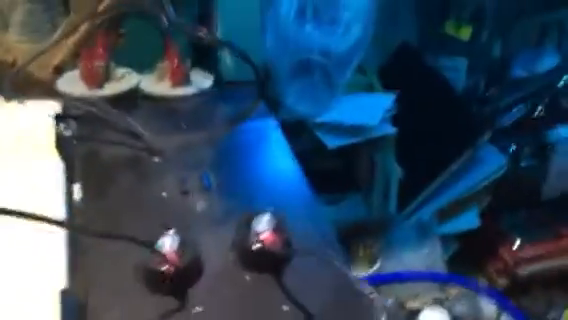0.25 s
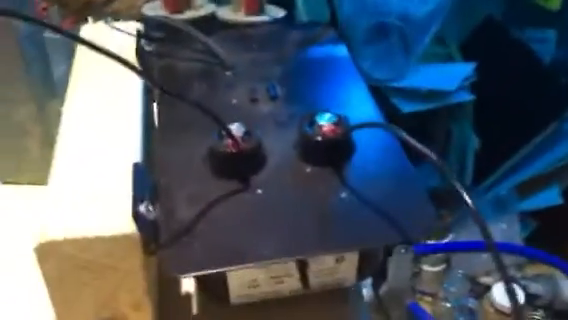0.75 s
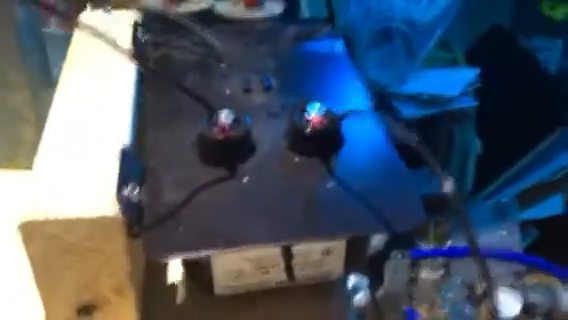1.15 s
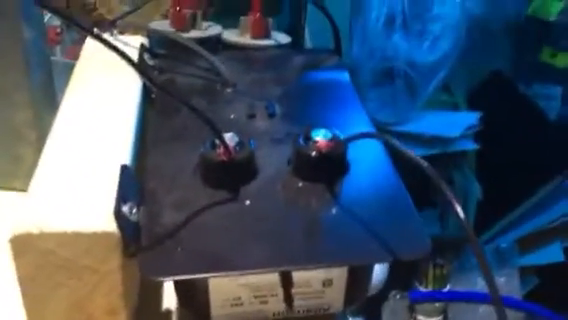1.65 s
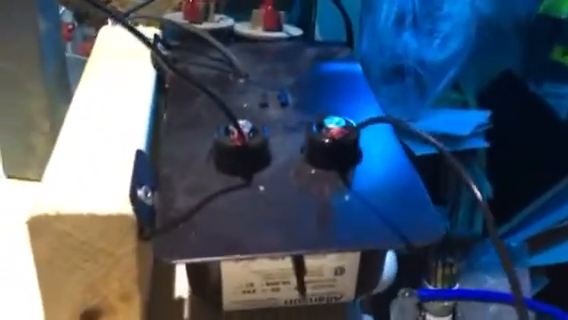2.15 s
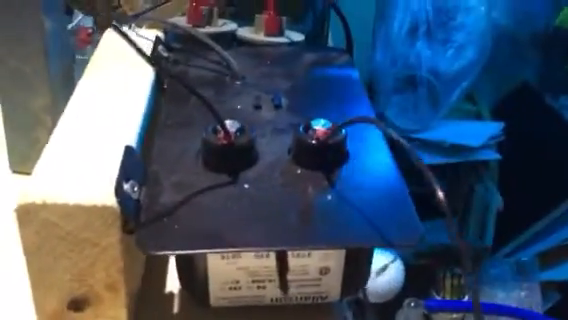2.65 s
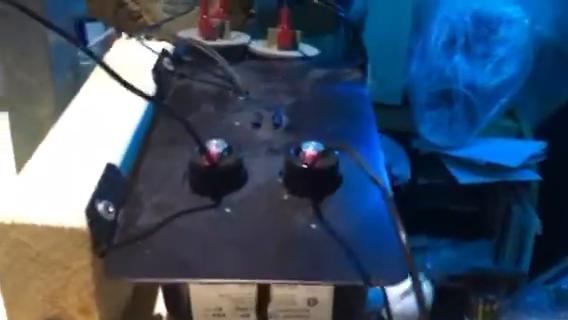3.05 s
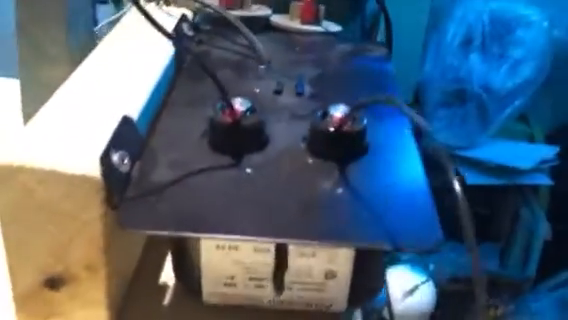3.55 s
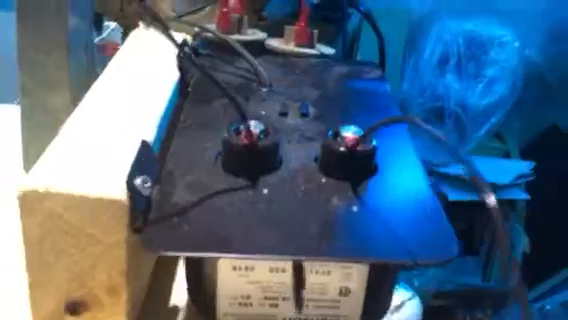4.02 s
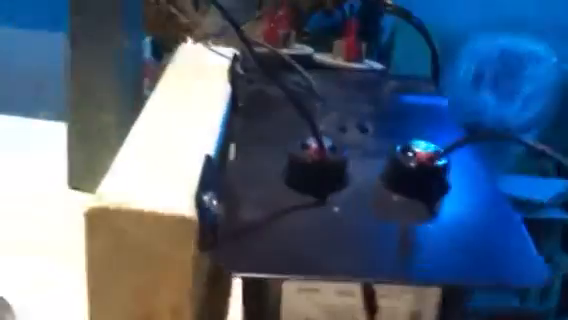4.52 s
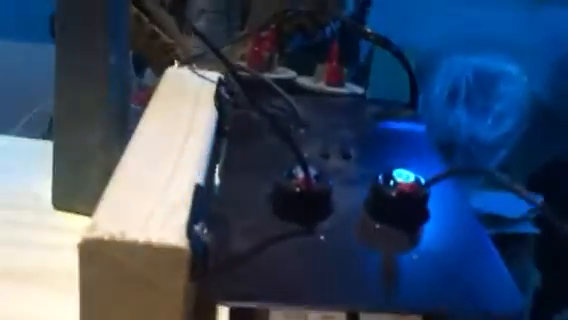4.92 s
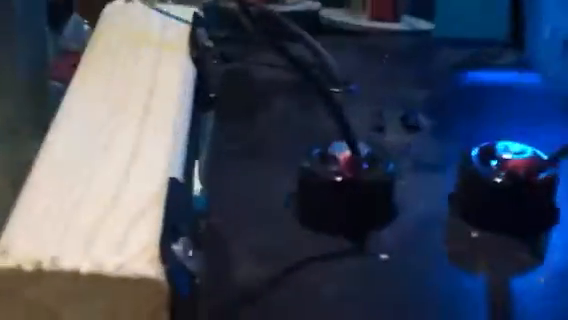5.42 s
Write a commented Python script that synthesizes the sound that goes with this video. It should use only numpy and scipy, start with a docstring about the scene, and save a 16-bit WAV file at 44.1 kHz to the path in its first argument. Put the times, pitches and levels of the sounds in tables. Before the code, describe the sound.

A homemade high-voltage device crackles in a fast, slightly uneven run of hard snaps, dry electrical ticks between them, over low rumble and hum.

```python
"""Sparking high-voltage rig in a small workshop

A home-built rig sparks about ten times a second; each crack is an impulse with near bounces and a ringing room.
The discharges leak into the microphone's wiring as dry double ticks, kicks and three heavy surges.
Two wandering hums and a rumble of filtered noise lie underneath; loud moments pull an automatic gain down.
"""
import sys
import numpy as np
from scipy import signal
from scipy.fft import rfft, irfft
from scipy.io import wavfile
from scipy.ndimage import uniform_filter1d, minimum_filter1d

SR = 44100
rng = np.random.default_rng(int(sys.argv[2]) if len(sys.argv) > 2 else 0)


def generate_wav(sig):
    """Save sig (samples, or channels by samples) to the path in sys.argv[1] as 16-bit PCM at SR."""
    pcm = np.round(np.clip(np.atleast_2d(sig).T, -1, 1) * 32767).astype(np.int16)
    wavfile.write(sys.argv[1], SR, pcm)


N = 250488


def from_db(db):
    """Decibels to amplitude gain."""
    return 10 ** (np.asarray(db) / 20)


def at_hz(points, hz):
    """Reads a (frequency [Hz], value) table on a log-frequency axis."""
    table_hz, values = np.transpose(points)
    return np.interp(np.log(np.maximum(hz, 1)), np.log(table_hz), values)


def in_time(rows):
    """Reads a (time [s], level [dB]) curve as a gain for every sample."""
    return from_db(np.interp(np.arange(N) / SR, *np.transpose(rows)))


def clicks(seconds, heights):
    """Single-sample impulses at the given times."""
    out = np.zeros(N)
    at = np.clip(np.round(np.asarray(seconds) * SR).astype(int), 0, N - 1)
    np.add.at(out, at, heights)
    return out


def fading(x, decay_s):
    """Each impulse becomes a jump that dies away exponentially."""
    return signal.lfilter([1], [1, -np.exp(-1 / (decay_s * SR))], x + 1e-18)


def swell(x, rise_s, decay_s):
    """Each impulse becomes a jump with a rounded front that dies away exponentially."""
    return fading(x, decay_s) - fading(x, 1 / (1 / rise_s + 1 / decay_s))


def causal_filter(spectrum, size=2048):
    """Minimum-phase response with the given magnitude shape, scaled to energy 1."""
    hz = np.arange(size // 2 + 1) * SR / size
    cepstrum = irfft(np.log(from_db(at_hz(spectrum, hz))))
    cepstrum[1:size // 2] *= 2      # folding the cepstrum forward makes the phase minimal
    cepstrum[size // 2 + 1:] = 0
    response = irfft(np.exp(rfft(cepstrum)))
    return response / np.sqrt(np.sum(response ** 2))


def hum(hz, wander_hz, flutter_db):
    """A tone whose pitch wanders and whose level flutters, rms about 1."""
    low_pass = signal.butter(2, 6, fs=SR, output="sos")
    slow = signal.sosfilt(low_pass, rng.standard_normal((2, N + SR)))[:, SR:]     # drop the filter's start-up
    wander, flutter = slow / np.std(slow)
    phase = 2 * np.pi * np.cumsum(hz + wander_hz * wander) / SR
    return np.sqrt(2) * from_db(flutter_db * flutter) * np.sin(phase)


# level of the low hum: (time [s], level [dB])
LOW_HUM_LEVEL = [(0, -45), (0.9, -40.5), (1.3, -51), (2.3, -46), (3.1, -52), (3.7, -46), (4.4, -50),
                 (4.97, -54), (5.15, -48), (5.68, -38)]
# level of the upper hum before its throb: (time [s], level [dB])
UPPER_HUM_LEVEL = [(0, -44.5), (0.3, -61), (0.43, -46), (0.87, -54.5), (1.3, -63), (2.1, -58.5), (2.7, -59),
                   (3.25, -46.5), (3.4, -66), (3.65, -56.5), (4.0, -64), (4.4, -50), (4.7, -55),
                   (4.97, -51.5), (5.11, -49.5), (5.41, -47), (5.68, -55)]
LOW_HUM_HZ, UPPER_HUM_HZ = 51, 257      # centre pitches
THROB_S, HUM_BETWEEN = 0.038, 0.47      # decay of each throb; gain the upper hum sinks back towards


def hums():
    """Two unsteady tones; the upper one jumps with each spark and sinks back."""
    spark_s = np.transpose(SPARK_EVENTS)[0]
    throb = HUM_BETWEEN + 2 * swell(clicks(spark_s, 0.87), 0.0026, THROB_S)
    low = in_time(LOW_HUM_LEVEL) * hum(LOW_HUM_HZ, wander_hz=3.67, flutter_db=0.5)
    upper = in_time(UPPER_HUM_LEVEL) * throb * hum(UPPER_HUM_HZ, wander_hz=5.0, flutter_db=3.5)
    return low + upper


# spectral shape of the rumble, only relative: (frequency [Hz], density [dB per Hz])
RUMBLE_COLOUR = [(30, -2), (60, -5), (200, 9), (340, 0), (550, -2), (1200, 1.5), (3000, -1.5), (8000, -5.5)]
# level of the rumble: (time [s], level [dB])
RUMBLE_LEVEL = [(0, -38), (0.9, -36), (1.5, -40), (2.7, -40), (4.3, -39.5), (4.75, -41.5), (5.68, -38)]


def rumble():
    """Steady random noise, darkened by a filter and slowly ridden in level."""
    noise = signal.fftconvolve(rng.standard_normal(N), causal_filter(RUMBLE_COLOUR, size=8192))[:N]
    return in_time(RUMBLE_LEVEL) * noise


# decay of the workshop: (frequency [Hz], time to fall 60 dB [s])
WORKSHOP_DECAY = [(500, 0.22), (1500, 0.2), (4000, 0.23), (9000, 0.35), (15000, 0.36)]
ROOM_RISE_S = .0007


def room_response(size=16000):
    """Echoes in octave bands, each dying at its own rate; lumpy at first, when few strong ones stand out."""
    t, out, below = np.arange(size) / SR, 0, 0
    echoes = rng.standard_normal(size)
    lump_db = 4 * np.exp(-t / .03) * (np.minimum(rng.exponential(1, size), 3) - 1)
    echoes = echoes * from_db(lump_db)
    for edge_hz in 300 * 2 ** np.arange(7):
        low_passed = signal.sosfilt(signal.butter(2, edge_hz, fs=SR, output="sos"), echoes)
        decay = from_db(-60 * t / at_hz(WORKSHOP_DECAY, edge_hz / np.sqrt(2)))
        out = out + (low_passed - below) * decay
        below = low_passed      # differences of low-passes add up without gaps
    return out * (1 - np.exp(-t / ROOM_RISE_S))


# sparks across the gap, wiring levels relative:
# (time [s], kick in the wiring [dB], spike in the wiring [dB], wait until ticking resumes [mains cycles])
SPARK_EVENTS = [(0.047, -25, -18, 2), (0.1466, -20.5, -17, 2), (0.2317, -17.5, -20, 2),
                (0.347, -18.5, -17, 2), (0.4466, -19, -18, 2), (0.5458, -22.5, -12, 2),
                (0.6131, -20, -15, 6), (0.731, -20, -14, 2), (0.8298, -17, -13, 2), (0.8975, -20, -10, 4),
                (0.9962, -15, -10, 2), (1.1144, -25, -12, 2), (1.213, -21, -12.5, 2),
                (1.3297, -18, -7.5, 0), (1.429, -26, -7, 4), (1.5289, -10.5, -8, 0), (1.6283, -30, -12, 2),
                (1.747, -31, -16, 2), (1.8461, -32, -14, 4), (1.9626, -34, -13, 4), (2.0635, -16, -9, 2),
                (2.1625, -26, -15, 2), (2.2635, -17, -7.5, 2), (2.3307, -36, -7, 2), (2.4471, -29, -17, 4),
                (2.5636, -25, -13, 2), (2.6634, -17, -9.5, 3), (2.7462, -28, -13, 2),
                (2.8742, -16, -10.5, 3), (2.9812, -17, -21, 0), (3.079, -15, -10, 0),
                (3.1783, -13.5, -10, 1), (3.2912, -14, -11, 3), (3.3958, -18, -5, 3), (3.5124, -3, -7, 4),
                (3.6117, -20, -6.5, 2), (3.6791, -30, -7.5, 3), (3.7954, -19.5, -25, 2),
                (3.8949, -31, -14, 1), (3.9785, -26, -16, 2), (4.0463, -29, -6.5, 3),
                (4.1571, -21, -9.5, 4), (4.279, -28, -9, 2), (4.3777, -30, -11.5, 1), (4.4952, -19, -15, 2),
                (4.5938, -25, -8, 2), (4.6949, -27, -5, 4), (4.7954, -12.5, -10, 2), (4.9121, -18, -13, 2),
                (5.0119, -12, -11, 2), (5.1115, -15, -13.5, 2), (5.2294, -15, -29, 2),
                (5.3468, -19, -20, 3), (5.4285, -14, -20, 1), (5.512, -13, -12, 4), (5.6281, -15.5, -30, 2)]
# colour of a spark at the microphone, only relative: (frequency [Hz], density [dB per Hz])
SPARK_COLOUR = [(300, -20.5), (450, -11), (1300, -5.5), (1720, -1), (2200, -3), (2850, -3.5), (3500, 2.5),
                (4400, 1.85), (5050, -1), (6600, 4), (7500, 0.6), (9200, 4.5), (10500, -1), (11700, 3),
                (15500, -5), (15900, -10.5)]
# bounces off the lid and bench close to the gap, before their spread: (delay [s], signed gain [ratio])
NEAR_BOUNCES = [(.00023, 0.18), (.00064, 0.086), (.0012, 0.33), (.0019, 0.12)]
CRACK_DB, CRACK_DB_PER_S = -12.5, 10    # relative level after a 0.1 s charge; a longer charge cracks louder
BOUNCE_SPREAD = 1           # each spark takes its own path, so its bounces differ
ROOM_DB = -21.5             # room echoes relative to the crack, before the direct sound is brightened
EARLIER_SPARK_S = .053      # the room still rings from a spark this long before the start


def sparks(count=8):
    """Crack, near bounces and room; the hand-held microphone drifts, so the echoes slowly turn into others."""
    s = np.transpose(SPARK_EVENTS)[0]
    charge_s = np.diff(s, prepend=s[0] - .1)
    height = from_db(CRACK_DB + CRACK_DB_PER_S * (charge_s - .1))
    out = clicks(s, height)
    for lag, gain in NEAR_BOUNCES:
        spread = 1 + BOUNCE_SPREAD * rng.standard_normal(len(s))
        out += clicks(s + lag, gain * height * spread)
    # the direct shock front is brighter than the room
    out = from_db(3.5) * signal.lfilter([1, -.6], [1], out)
    tail = room_response()[int(EARLIER_SPARK_S * SR):]
    out[:len(tail)] += from_db(ROOM_DB + CRACK_DB) * tail
    place = s * SR / N * (count - 1)
    for k in range(count):      # equal-power crossfade from each room response to the next
        share = np.cos(np.pi / 2 * np.clip(place - k, -1, 1))
        out += from_db(ROOM_DB) * signal.fftconvolve(clicks(s, height * share), room_response())[:N]
    return from_db(14.0) * signal.fftconvolve(out, causal_filter(SPARK_COLOUR))[:N]


SPIKE_GAP_S, GAP_SPREAD = 0.001074, .3      # typical extra gap between a spark's two spikes; log spread


def spark_pickup():
    """Each spark jolts the wiring directly: a rounded kick and two opposite spikes, without any room."""
    s, kick_db, spike_db, _ = np.transpose(SPARK_EVENTS)
    gap = SPIKE_GAP_S * np.exp(GAP_SPREAD * rng.standard_normal(len(s)))
    kicks = swell(clicks(s + 0.00025, from_db(kick_db)), 0.0012, 0.0012)
    first = clicks(s + 0.00012, from_db(spike_db))
    second = clicks(s + 0.00018 + gap, 1.37 * from_db(spike_db))
    return fading(first - second, .00005) - kicks


# strength of the ticking, relative and before its spread: (time [s], level [dB])
TICK_STRENGTH = [(0, -25), (0.62, -15), (0.78, -9), (1.45, -7), (1.62, -11), (1.8, -22), (1.95, -12),
                 (2.5, -8.5), (2.97, -4.5), (3.12, -10), (3.46, -3.5), (3.62, -24), (3.9, -7.5),
                 (4.12, -15), (4.25, -7), (4.65, -14.5), (4.85, -7.5), (5.33, -6.5), (5.68, -17.5)]
# single double-ticks outside the pattern, relative: (time [s], level [dB])
STRAY_TICKS = [(1.4477, -5), (1.8634, -17), (3.5133, -5), (3.6835, -25), (4.258, -16), (4.0488, -20),
               (5.3, -15), (3.631, -13), (4.7125, -12), (5.5298, -17)]
MAINS_HZ, TICK_PHASE, SPARK_PHASE = 60.03, .935, .8     # where in the mains cycle ticks and sparks fall
# ticks come early right after a spark, and ever earlier as the charge goes on
EARLY_AFTER_SPARK_S, EARLIER_PER_CYCLE_S = 0.0013, .0007
TICK_SPREAD_DB = 2.0


def tick_pattern():
    """Every second mains cycle the charging rig ticks; each spark breaks the run off and starts a new one."""
    s, *_, wait = np.transpose(SPARK_EVENTS)
    cycle = np.round(s * MAINS_HZ - SPARK_PHASE)
    ends = np.append(cycle[1:], N / SR * MAINS_HZ - 1)
    runs = []
    for c, w, end in zip(cycle, np.round(wait), ends):
        runs += [(c, k) for k in np.arange(w, end - c, 2)]
    start, since = np.transpose(runs)
    early = EARLY_AFTER_SPARK_S * (since < 2) + EARLIER_PER_CYCLE_S * np.maximum(since - 4, 0)
    at = (start + since + TICK_PHASE) / MAINS_HZ - early
    db = np.interp(at, *np.transpose(TICK_STRENGTH)) + TICK_SPREAD_DB * rng.standard_normal(len(at))
    return np.hstack([[at, db], np.transpose(STRAY_TICKS)])


def ticking():
    """Charging leaks in as dry pairs of softened spikes, each with a faint tail gone within a millisecond."""
    s, tick_db = tick_pattern()
    second = .71 * from_db(tick_db + rng.normal(0, 1.5, len(s)))
    spikes = clicks(s, from_db(tick_db)) + clicks(s + 21 / SR, second)     # 21 samples apart
    softened = signal.sosfilt(signal.butter(1, 6500, fs=SR, output="sos"), spikes)
    return from_db(7.5) * softened + from_db(-28.5) * fading(spikes, 0.0001)


# heavy surges in the wiring, levels before the fronts are rounded:
# (time [s], level [dB], polarity [sign], rise [s], decay [s], lead of opening spike [s], spike level [dB])
SURGE_EVENTS = [(1.6287, 22.5, -1, 0.0044, 0.0012, 0.00064, 12),
                (3.3972, 23.5, 1, 0.0069, 0.0032, 0.00095, 3.5),
                (4.5964, 11.5, -1, 0.0007, 0.0015, 0.000984, 2.5)]
SURGE_SPIKE_S = .00007      # decay of the opening spike


def surges():
    """Heavy electrical jolts: a short opening spike, then a rounded jump that dies away."""
    out = np.zeros(N)
    for at, surge_db, polarity, rise_s, decay_s, lead_s, opening_db in SURGE_EVENTS:
        out += fading(clicks([at - lead_s], from_db(opening_db)), SURGE_SPIKE_S)
        out += swell(clicks([at], np.sign(polarity) * from_db(surge_db)), rise_s, decay_s)
    return out


def scene():
    """Air-borne sparks, the electrical pick-up and the background, in one channel."""
    air = sparks()
    pickup = ticking() + spark_pickup() + surges()
    background = rumble() + hums()
    return (air + pickup + background)[None]


def gain_control(x, ceiling_db, share, release_db_per_s, window_s, sense_hz):
    """A share of the level above the ceiling pulls the gain down a moment early; it recovers at a steady rate."""
    size = int(window_s * SR)
    # it hears little deep bass
    sensed = signal.sosfilt(signal.butter(1, sense_hz, "high", fs=SR, output="sos"), x)
    level_db = 10 * np.log10(uniform_filter1d(sensed ** 2, size) + 1e-12)
    ahead_db = -minimum_filter1d(-level_db, size // 4)      # running maximum
    ramp = release_db_per_s * np.arange(N) / SR
    held_db = np.maximum.accumulate(share * (ahead_db - ceiling_db) + ramp) - ramp
    cut_db = np.maximum(held_db, 0)
    return x * from_db(-uniform_filter1d(cut_db, size // 4))


# all-pass corners of the input stage: (frequency [Hz])
SMEAR_CORNERS = [66, 202, 885, 6090]
LOW_CUT_HZ, LOW_CUT_BUMP_DB = 54, 1     # the low cut peaks a little before it falls
RELEASE_DB_PER_S = 18       # recovery of the automatic gain
OVERLOAD = 0.75             # peaks are rounded towards this height
CUTOFF_HZ = 16900           # from here up the top cut is 60 dB down


def record(dry):
    """The input stage delays and cuts bass, so jumps become falling thumps; gain control; overload; top cut."""
    x = dry[0]
    for hz in SMEAR_CORNERS:
        a = (np.tan(np.pi * hz / SR) - 1) / (np.tan(np.pi * hz / SR) + 1)
        x = signal.lfilter([a, 1], [1, a], x)
    x = signal.sosfilt(signal.cheby1(2, LOW_CUT_BUMP_DB, LOW_CUT_HZ, "high", fs=SR, output="sos"), x)
    x = gain_control(x, ceiling_db=-14.5, share=0.57, release_db_per_s=RELEASE_DB_PER_S,
                     window_s=0.0041, sense_hz=121)
    x = OVERLOAD * np.tanh(x / OVERLOAD)
    return signal.sosfilt(signal.cheby2(12, 60, CUTOFF_HZ, fs=SR, output="sos"), x)[None]


dry = scene()
out = record(dry)
generate_wav(out)
```